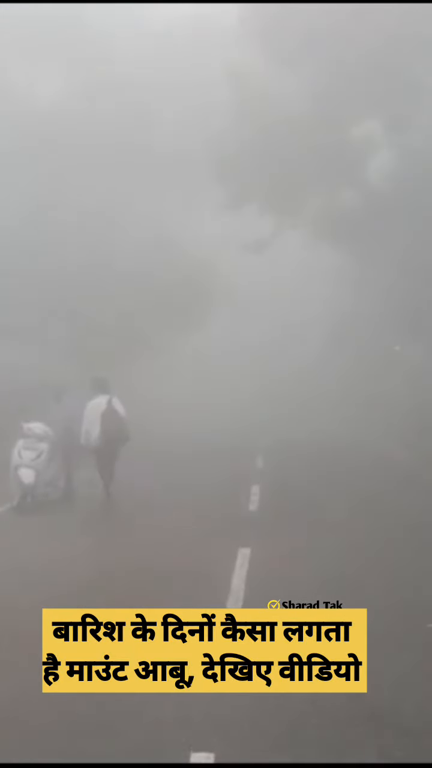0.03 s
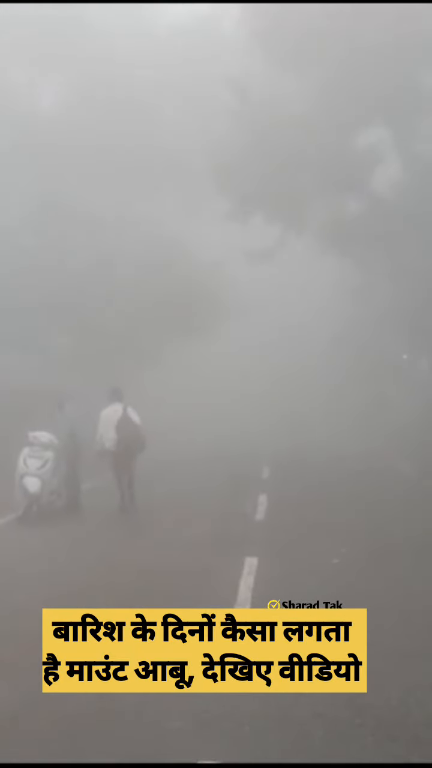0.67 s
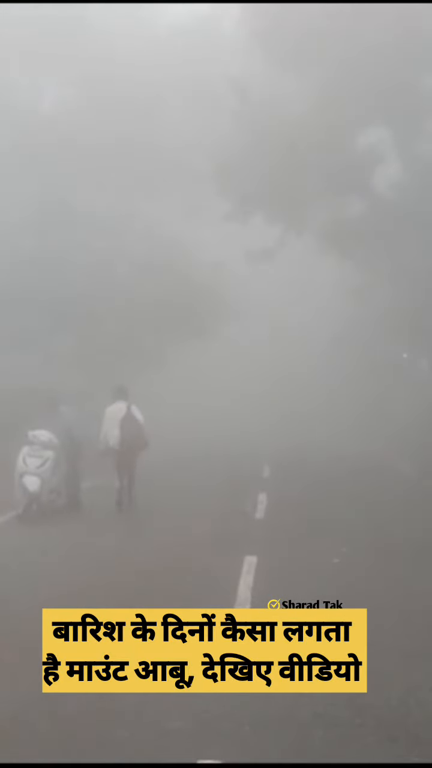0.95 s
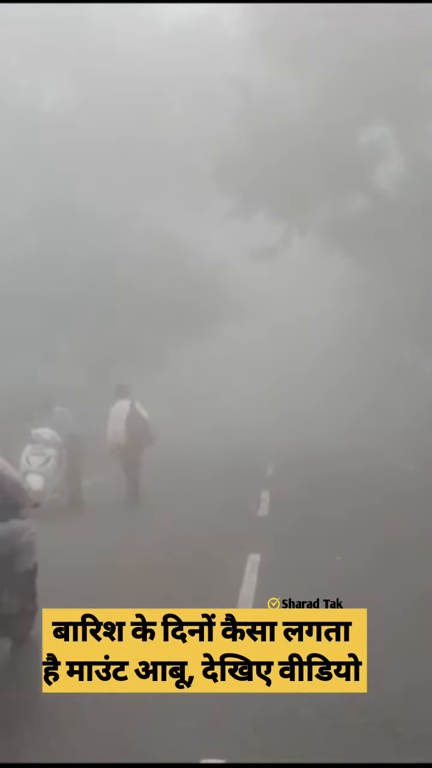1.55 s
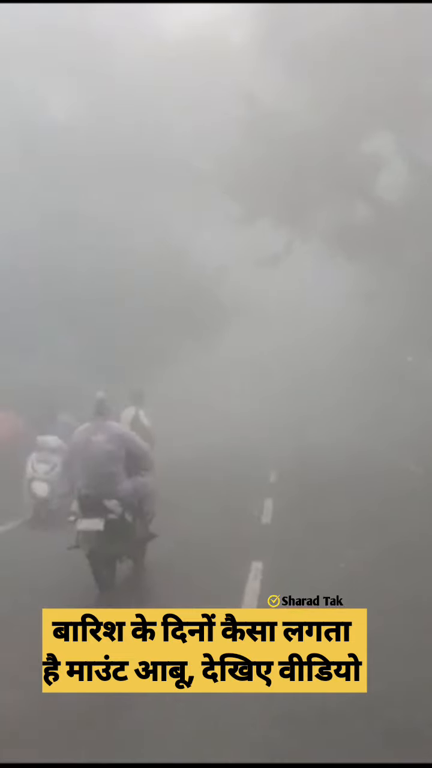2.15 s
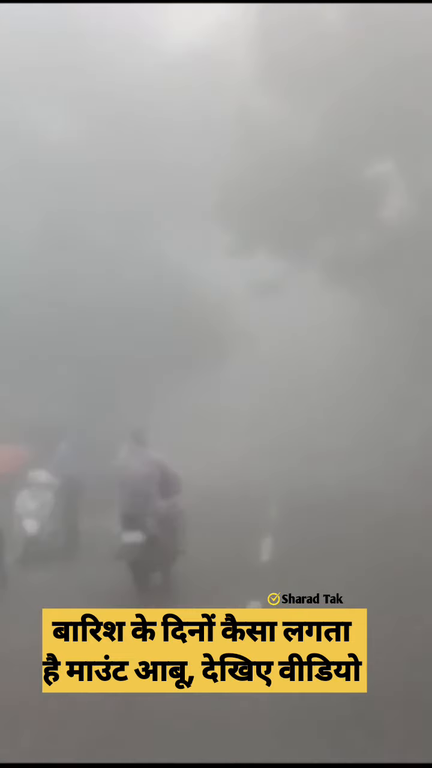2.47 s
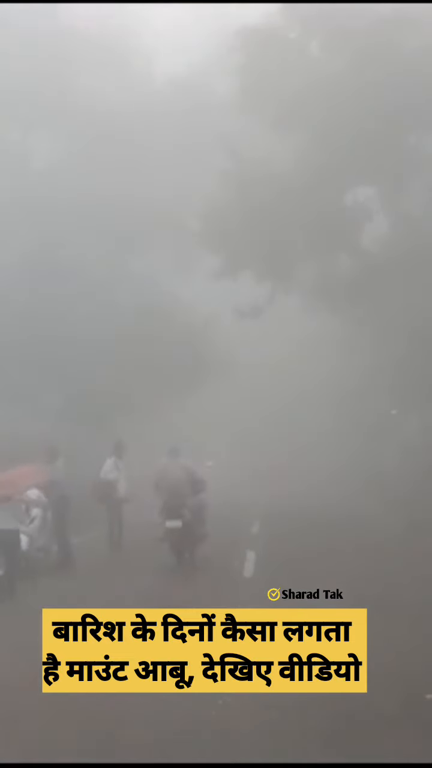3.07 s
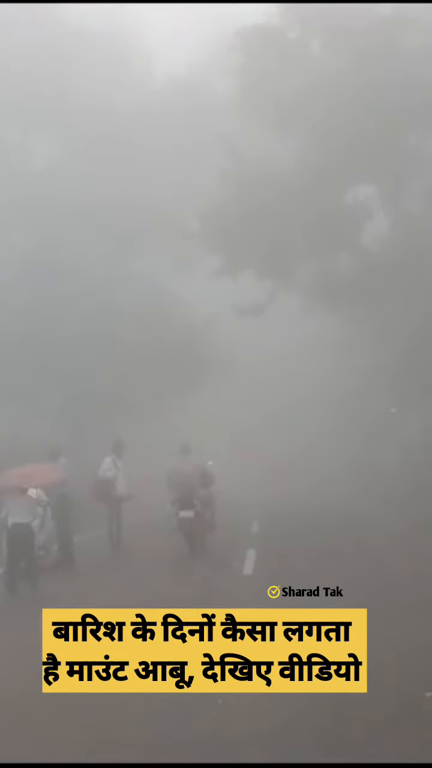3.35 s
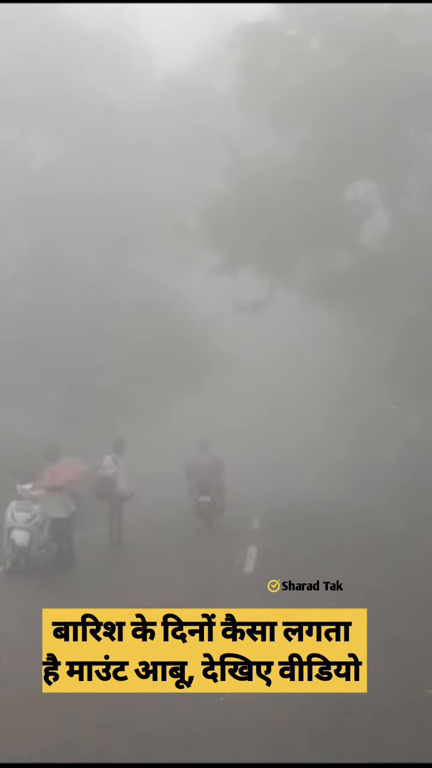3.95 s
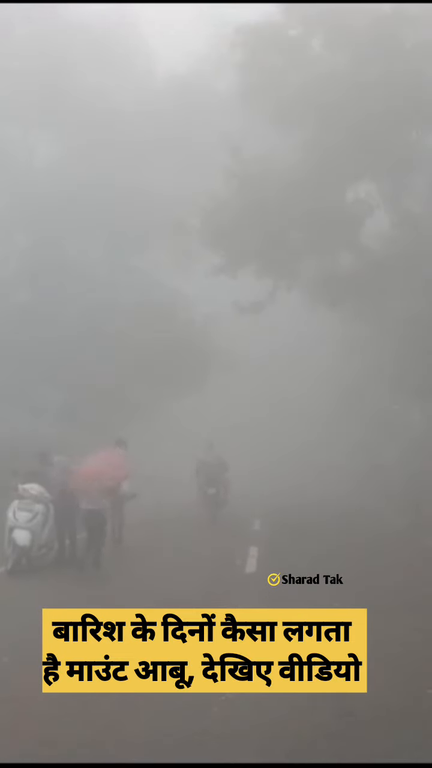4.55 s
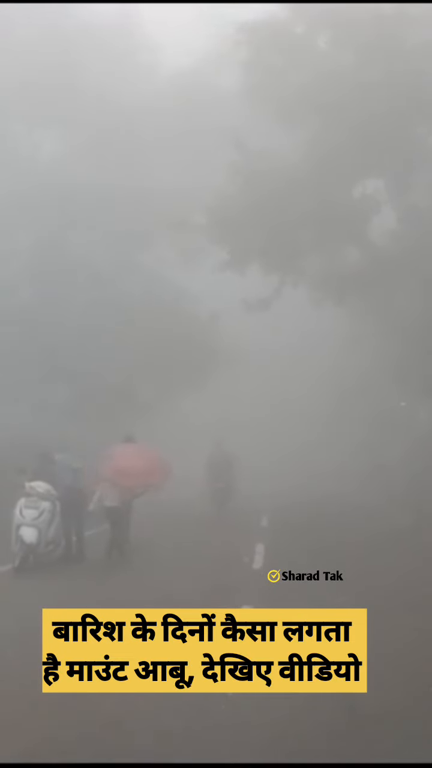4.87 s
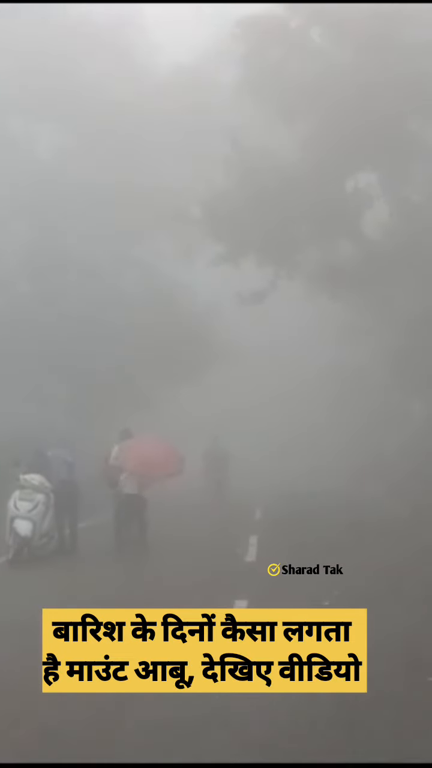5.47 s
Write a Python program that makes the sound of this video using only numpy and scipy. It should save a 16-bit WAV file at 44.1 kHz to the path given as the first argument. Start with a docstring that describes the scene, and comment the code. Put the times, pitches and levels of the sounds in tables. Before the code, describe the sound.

A motorbike passes close by on a wet street and rides off under steady rain, with a few drips and small bird chirps.

```python
"""A wet street in misty rain: a single-cylinder motorbike passes close by and rides off.
Each firing rings its silencer and spits gas from the pipe; valve gear and chain rattle the casing,
and the front tyre flings water. The street's echo takes over as the engine eases in the distance.
Under it lies a steady wash of rain, with near drips and a few small birds."""
import sys
import numpy as np
from scipy import signal
from scipy.fft import rfft, irfft
from scipy.io import wavfile
from scipy.ndimage import uniform_filter1d

SR = 44100
rng = np.random.default_rng(int(sys.argv[2]) if len(sys.argv) > 2 else 0)


def file_out(sig):
    """Save sig as 16-bit WAV at sys.argv[1]."""
    # one column per channel
    cols = np.atleast_2d(sig).T
    # limit, then scale
    lim = np.clip(cols, -1, 1)
    pcm = np.round(lim * 32767).astype(np.int16)
    wavfile.write(sys.argv[1], SR, pcm)


N = 242991
T = np.arange(N) / SR
HZ = np.fft.rfftfreq(N, 1 / SR)
PASS_S, SPEED_M_PER_S, LANE_M = 0.22, 6.74, 2.57  # abreast at PASS_S, LANE_M to the side
SOUND_M_PER_S = 343


# Engine speed. Each row: time in seconds, firings per second.
FIRING_RATE = [(0.0, 22.5), (0.42, 22.15), (0.6, 21.3), (1.0, 20.9), (1.4, 20.46), (1.8, 20.11),
               (2.2, 19.61), (2.6, 19.56), (2.9, 18.64), (3.2, 17.89), (3.6, 18.2), (4.0, 18.13),
               (4.3, 19.27), (4.6, 18.82), (4.9, 19.09), (5.2, 19.43), (5.5, 19.53)]
def cycles():
    """Running count of engine cycles; each whole number is a firing."""
    return np.cumsum(curves(FIRING_RATE)[0]) / SR + .48


def since_firing(delay_s):
    """Seconds since the last firing less delay_s; zero until then."""
    return np.maximum((cycles() % 1) / curves(FIRING_RATE)[0] - delay_s, 0)


def burst(delay_s, rise_s):
    """A quick swell and decay after each firing."""
    age = since_firing(delay_s) / rise_s
    return age * np.exp(1 - age)


def thump(hz, rise_s, sharpness, delay_s=0):
    """A silencer resonance that swells and dies after each firing."""
    envelope = burst(delay_s, rise_s) ** sharpness
    envelope *= np.minimum(10 * (1 - cycles() % 1), 1)  # gone before the next firing
    return evened(envelope * np.sin(2 * np.pi * hz * since_firing(delay_s)))


# Throttle, easing off and picking up. Each row: time in seconds, engine effort in dB.
EFFORT = [(2.4, -1.5), (2.7, -3.8), (3.55, -1.8), (3.85, -6), (4.1, -9), (4.45, -8), (5.1, -9), (5.5, -6.5)]
def exhaust():
    """Uneven firings ring the silencer; the street's echo stands out as the engine eases."""
    effort_db = curves(EFFORT)[0]
    echo_gain = amp(-12 - 0.73 * effort_db)
    boom_hz = 128.0 + 0.7 * effort_db  # rings lower as the engine eases
    # near reflections stretch the far thumps
    smear_s = np.interp(T, [1, 2.7, 3.2, 5.5], [0.011, 0.009, 0.016, 0.012])
    boom = thump(boom_hz, rise_s=smear_s, sharpness=1.76) * amp((-0.5 + 0.63 * echo_gain) * drift(16))
    bark_hz = np.interp(T, [.55, 1.1], [290, 260])
    bark = thump(bark_hz, rise_s=0.0058, sharpness=1.4, delay_s=0.00451) * amp(0.32 * drift(23))
    throb = np.sin(4 * np.pi * cycles()) * amp(2 * drift(25))  # second engine order
    # three sets of echoes crossfade along the road
    thumps = boom + amp(-13.0) * bark
    echoes = sum(np.cos(np.pi * (1.084 * T + k / 3)) * street_echo(thumps) for k in range(3))
    echoing_boom = steadied(boom + echo_gain * steadied(echoes, span_s=.15), span_s=.15)
    return level("boom") * echoing_boom + level("bark") * bark + level("throb") * throb


# Casing resonances. Each row: pitch in Hz, nominal width in Hz, relative level in dB,
# time it faces the listener in seconds, half length of that swell in seconds.
CASING_MODES = [(806, 39, -4.5, 0.94, 0.72), (1325, 25, 1.5, 0.47, .11), (1631, 55, -1.5, 0.043, 0.23),
                (1639, 58, 3.5, 0.726, 0.18), (2376, 162, -2, 1.0, 1), (2954, 40, -7, 0.25, 0.14),
                (3348, 39, 6.5, 0.28, 0.097), (3353, 43, 6, 0.015, 0.037), (4155, 270, 0, 0.41, 0.38),
                (759, 110, 3, 1.06, 0.35), (598, 65, -5, 0.62, 0.18), (434, 57, -0.5, 2.2, 0.21)]
def casing_rings(lag_s):
    """Flurries of knocks ring the casing; each Doppler-shifted resonance beams past in turn."""
    doppler = 1 / (1 + bearing() * SPEED_M_PER_S / SOUND_M_PER_S)
    rings = np.zeros((2, N))
    for hz, width_hz, db, facing_s, span_s in CASING_MODES:
        carrier = np.exp(2j * np.pi * np.cumsum(hz * doppler) / SR)
        left, right = 1 + .5 * rng.standard_normal((2, N))
        knocks = impacts(per_s=600, spread_db=-2.0) * amp(2 * drift(28))
        knocks *= 1 + 0.14 * burst(0.0036, 0.0012)
        blows = knocks * np.array([left * np.exp(-2j * np.pi * hz * lag_s), right])
        pole = [1, -np.exp(-np.pi * width_hz * 2 / SR)]
        envelope = signal.lfilter([1], pole, signal.lfilter([1], pole, blows / carrier))
        rings += amp(db) * (0.074 + swell(facing_s, span_s)) * evened((envelope * carrier).real)
    return rings


# Broad clatter spectrum. Each row: frequency in Hz, relative density in dB.
CLATTER_SPECTRUM = [(25, -9), (70, 4), (200, 1), (450, -7), (680, -12), (850, 1), (1100, 0), (1600, 3),
                    (1950, 4.5), (2500, -2), (4200, 3.5), (4800, -7), (6300, 2), (7500, -16), (8800, -30.5),
                    (16000, -21.5)]
def clatter(lag_s):
    """Broad engine noise, combed by a road bounce whose delay slides as the bike moves."""
    correlation = spectrum([(200, 0.85), (600, 0.97), (3500, 0.073), (6000, 0.85)])
    direct = noise(amp(spectrum(CLATTER_SPECTRUM)), correlation, lag_s)
    bounce_s = np.interp(T, [0, .35, .9, 2], [0.00123, 0.001306, 0.00138, 0.00068])
    bounce_gain = np.interp(T, [.6, 1.3], [.4, .1])
    combed = direct + bounce_gain * np.array([np.interp(T - bounce_s, T, side) for side in direct])
    return patchy(combed / band_rms(combed, 1400, 4800), db=3.4, width_hz=170, span_s=.06)


def casing():
    """Valve gear and chain rattle the casing; its ring blurs into clatter with distance."""
    near_share, far_share, reach_m = 0.92, 0.8, 58
    ring_share = far_share + (near_share - far_share) * np.exp(-(distance_m() / reach_m) ** 2)
    lag_s = -0.000397  # left leads
    body = amp(-1) * ring_share * casing_rings(lag_s)
    body += amp(-2) * np.sqrt(1 - 0.5 * ring_share ** 2) * clatter(lag_s)
    strokes = evened(1 + 0.19 * burst(0.0045, 0.0048) + 0.056 * burst(0.018, 0.00083))
    strokes *= amp(0.17 * drift(100))
    return level("casing") * strokes * body * bike_pan()


# Gas hiss spectrum. Each row: frequency in Hz, relative density in dB.
HISS_SPECTRUM = [(2000, -58), (5000, -2), (6150, 17.5), (7200, 9), (8600, 1), (11500, 5.5), (14000, 0),
                 (16000, -4)]
# Gas hiss balance. Each row: frequency in Hz, left over right in dB.
HISS_PAN = [(3000, -9), (6200, -12), (8000, 56), (9500, 26), (11500, 10), (13500, 0), (16000, -1)]
def pipe_hiss():
    """The pipe spits gas with each firing."""
    hiss = noise(amp(spectrum(HISS_SPECTRUM)) * pan(spectrum(HISS_PAN)))
    hiss = patchy(hiss / band_rms(hiss, 9000, 15000), db=3.5, width_hz=350, span_s=.06)
    spits = evened(0.66 + burst(0.0045, 0.0037) * amp(3.6 * drift(12)))
    return level("hiss") * spits * hiss


def chink():
    """A bright metal chink with each firing, higher coming and lower leaving."""
    hz = 6270 - 386 * bearing() + 100 * drift(14) + 260 * drift(867)
    strikes = burst(0.0071, 0.0034) * amp(4.03 * drift(30))
    return level("chink") * strikes * np.sin(2 * np.pi * np.cumsum(hz) / SR) * bike_pan()


# Tyre spray spectrum. Each row: frequency in Hz, relative density in dB.
SPRAY_SPECTRUM = [(2000, -30), (5200, 0), (6400, -9), (8000, 7), (8900, -25), (16000, -28)]
def tyre_spray():
    """Water flung ahead by the front tyre sizzles thinly."""
    spray = evened(noise(amp(spectrum(SPRAY_SPECTRUM))))
    return level("spray") * patchy(spray, db=12.5, width_hz=140, span_s=0.044) * bike_pan()


# Radiation of the bike's parts. Each row, by name: gain at LANE_M in dB, loss per tenfold distance
# in dB, boost when facing in dB, time it faces in seconds, half length in seconds (sign ignored).
RADIATION = {"boom": (-29, 3, 14, 0.9, 0.75), "bark": (-31.5, 14, 6.5, 0.4, 0.12),
             "throb": (-38, 26, 7, .42, 0.8), "casing": (-28, 25, 8, 0.01, 0.62),
             "spray": (-41.5, 27, 19, -0.5, -0.34), "hiss": (-52.5, 18, 7.3, 0.88, 1),
             "chink": (-29.5, 27.5, 14.5, 0.2, 0.47)}
def level(part):
    """Gain of one part of the bike, from effort, distance and the way it faces."""
    db, loss_db, facing_db, facing_s, span_s = RADIATION[part]
    distance_db = -loss_db * np.log10(distance_m() / LANE_M)
    return amp(db + curves(EFFORT)[0] + distance_db + facing_db * swell(facing_s, span_s))


def distance_m():
    """Range of the bike on its straight path."""
    return np.hypot(LANE_M, SPEED_M_PER_S * (T - PASS_S))


def bearing():
    """From -1 (coming) through 0 (abreast) to 1 (leaving)."""
    return SPEED_M_PER_S * (T - PASS_S) / distance_m()


def bike_pan():
    """The bike's treble swings from the right towards the middle."""
    abreast_db, away_db = -14, -2
    return pan(abreast_db + (away_db - abreast_db) * bearing())


# Rain wash spectrum. Each row: frequency in Hz, relative density in dB.
WASH_SPECTRUM = [(30, -9), (70, 5), (130, 9.5), (230, 2), (400, 0), (900, -0.5), (1600, -5.5), (2500, -11),
                 (3800, -12.5), (4900, -19.5), (6300, -13), (7500, -26), (9000, -34.5), (16000, -38)]
# Rain wash balance. Each row: frequency in Hz, left over right in dB.
WASH_PAN = [(60, 2), (110, 0.5), (200, -2), (380, 0), (700, -2.5), (1290, -6), (2380, -6.5), (4400, -9),
            (8120, -4.5), (15000, 10)]
# Diffuse sound of the street. Each row: frequency in Hz, left-right correlation.
DIFFUSE_CORRELATION = [(100, 0.9), (280, 0.75), (550, 0.68), (900, 0.028), (3000, 0.19), (8000, 0.082)]
def rain_wash():
    """Far rain on the wet street merges into a wash that slowly sinks in level."""
    colour = amp(spectrum(WASH_SPECTRUM)) * pan(spectrum(WASH_PAN))
    wash = evened(noise(colour, spectrum(DIFFUSE_CORRELATION)))
    wash = patchy(wash, db=1.8, width_hz=180, span_s=.1)
    wash_db = np.interp(T, [0, 3.5, 4.3, 5.5], [-31.0, -40.5, -40.0, -42.0])
    return amp(wash_db + 0.053 * drift(6)) * wash


# Flurries of drops. Each row: centre in seconds, half length in seconds, level in dB.
PATTER_FLURRIES = [(2.39, 0.061, -46), (3.705, 0.2, -49)]
def rain_patter():
    """Nearer drops patter faintly on the right and swell in two flurries."""
    drops = np.array([impacts(per_s=960, spread_db=3.5), impacts(per_s=890, spread_db=4)])
    colour_db = spectrum([(600, -30), (1900, -2), (2700, 17.0), (3400, 11), (4500, 6),
                          (9000, -16), (15000, -46)])
    patter = evened(irfft(rfft(drops) * amp(colour_db), N)) * pan(-12)
    flurries = sum(amp(db) * swell(centre_s, span_s) for centre_s, span_s, db in PATTER_FLURRIES)
    return (amp(-62.5) + flurries) * patter


# Near drips. Each row: start in seconds, relative level in dB, pitch in Hz.
NEAR_DRIPS = [(2.3027, -37, 2890), (2.34, -34, 2780), (2.4265, -26, 2750), (3.2113, -31.5, 3050),
              (3.4315, -36, 2310), (3.6247, -36, 2160), (3.714, -33, 2580), (3.763, -34.5, 2670),
              (3.881, -38, 2420), (3.9119, -29, 2550), (5.3816, -39.5, 2450)]
def drips():
    """Fat drops pat on something soft nearby, each with a short spray."""
    out, t = np.zeros((2, N)), np.arange(SR // 12) / SR
    age = t / 0.00083
    for start_s, db, hz in NEAR_DRIPS:
        pat = (age * np.exp(1 - age)) ** 2 * np.sin(2 * np.pi * hz * t)
        band = signal.butter(2, [0.76 * hz, 1.24 * hz], "band", fs=SR, output="sos")
        spray = signal.sosfilt(band, rng.standard_normal((2, len(t)))) * np.exp(-t / 0.02)
        add(out, start_s, amp(db + 3.5) * (pat + 0.8 * spray) * pan(-15))
    return out


# Fine splashes. Each row: start in seconds, relative level in dB, decay time in seconds.
FINE_SPLASHES = [(3.89, -59, .01), (4.409, -56, 0.015), (4.727, -51, .002), (5.002, -60, .006)]
def splashes():
    """Small drops burst in a fizz."""
    out, t = np.zeros((2, N)), np.arange(SR // 12) / SR
    highpass = signal.butter(2, 4500, "high", fs=SR, output="sos")
    for start_s, db, decay_s in FINE_SPLASHES:
        fizz = signal.sosfilt(highpass, rng.standard_normal((2, len(t))))
        add(out, start_s, amp(db + 6) * fizz * np.exp(-t / decay_s) * pan(3))
    return out


# Bird chirps. Each row: start in seconds, length in seconds, first and last pitch in Hz,
# relative level in dB, left over right in dB, rms pitch jitter in Hz.
BIRD_CHIRPS = [(2.079, 0.075, 5970, 5420, -43, -5, 706), (2.808, 0.066, 6480, 6160, -39.5, 9, 50),
               (3.697, 0.064, 4220, 4820, -43, 1, 420), (3.784, 0.053, 3630, 4250, -45, -5, 320),
               (4.57, 0.071, 8500, 8900, -59, -10, 150), (5.011, 0.078, 6270, 5950, -45.5, 10, 220),
               (5.052, .15, 5980, 6000, -56, -10, 200), (5.086, 0.048, 3600, 4100, -48.5, 7, 250)]
def birds():
    """Short gliding chirps from the trees; pitch jitter makes some raspy."""
    out = np.zeros((2, N))
    for start_s, length_s, first_hz, last_hz, db, left_db, jitter_hz in BIRD_CHIRPS:
        count = int(length_s * SR)
        hz = np.linspace(first_hz, last_hz, count) + jitter_hz * drift(710)[:count]
        note = np.sin(2 * np.pi * np.cumsum(hz) / SR) * np.hanning(count)
        add(out, start_s, amp(db + 1) * note * pan(left_db))
    return out + amp(-8) * street_echo(out)


# Street reverberation. Each row: frequency in Hz, time to fall 60 dB in seconds.
STREET_T60 = [(100, 0.56), (500, 0.14), (3000, 0.28), (12000, 0.21)]
def street_echo(x):
    """Scattered echoes from walls and trees, alike on both sides in the bass."""
    taps = rng.standard_normal((2, SR)) * (np.arange(SR) > .012 * SR)
    hz, t, (a, b) = signal.stft(taps, SR, nperseg=512)
    correlation = spectrum(DIFFUSE_CORRELATION, hz)[:, None]
    bins = np.array([a, correlation * a + np.sqrt(1 - correlation ** 2) * b])
    decay = amp(-60 * t / spectrum(STREET_T60, hz)[:, None])
    tail = signal.istft(bins * decay, SR, nperseg=512)[1]
    wet = signal.fftconvolve(np.atleast_2d(x), tail, axes=1)[:, :N]
    return evened(wet) * np.std(x)


def amp(db):
    """Decibels to gain."""
    return 10 ** (np.asarray(db) / 20)


def evened(x):
    """Scales to rms 1."""
    return x / np.sqrt(np.mean(x ** 2) + 1e-20)


def steadied(x, span_s):
    """Scales to a running rms near 1."""
    power = uniform_filter1d((x ** 2).mean(0), int(span_s * SR))
    return x / np.sqrt(uniform_filter1d(power, int(span_s * SR)) + 1e-12)


def band_rms(x, low_hz, high_hz):
    """Level of the mid channel within a band."""
    return np.std(irfft(rfft(x.mean(0)) * ((HZ > low_hz) & (HZ < high_hz)), N))


def spectrum(points, hz=HZ):
    """Joins points on a log-frequency axis."""
    point_hz, value = np.transpose(points)
    return np.interp(np.log(hz + 1), np.log(point_hz + 1), value)


def curves(rows):
    """Each column of a time table, sample by sample."""
    times_s, *columns = np.transpose(rows)
    return [np.interp(T, times_s, column) for column in columns]


def swell(centre_s, span_s):
    """A Gaussian rise and fall."""
    return np.exp(-((T - centre_s) / span_s) ** 2)


def pan(left_db):
    """Stereo gains for a level of left over right."""
    pair = amp(np.array([[.5], [-.5]]) * left_db)
    return pair / np.sqrt(np.mean(pair ** 2, axis=0))


def add(mix, start_s, sound):
    """Mixes in a stereo sound."""
    part = mix[:, max(round(start_s * SR), 0):][:, :sound.shape[-1]]
    part += sound[..., :part.shape[-1]]


def drift(hz):
    """Smooth random motion of rms 1, rolled off above hz."""
    return evened(irfft(rfft(rng.standard_normal(N)) * np.exp(-(HZ / hz) ** 2), N))


def noise(gain, correlation=0, lag_s=0):
    """Coloured stereo noise, the left side late by lag_s."""
    a, b = rfft(rng.standard_normal((2, N)))
    left = a * np.exp(-2j * np.pi * HZ * lag_s)
    right = correlation * a + np.sqrt(1 - correlation ** 2) * b
    return irfft(gain * np.array([left, right]), N)


def impacts(per_s, spread_db):
    """Random impulses of uneven size."""
    size = amp(spread_db * np.minimum(rng.exponential(1, N), 3))
    return size * rng.choice([-1, 1], N) * (rng.random(N) < per_s / SR)


def patchy(x, db, width_hz, span_s):
    """Random patches of the spectrum swell and fade, on scales of width_hz and span_s."""
    hz, t, bins = signal.stft(x, SR, nperseg=1024, noverlap=768)
    shape = bins.shape[1:]
    along = np.fft.fftfreq(len(hz), hz[1])[:, None] * width_hz
    across = np.fft.rfftfreq(len(t), t[1]) * span_s
    blur = np.exp(-along ** 2 - across ** 2)
    field = np.fft.irfft2(np.fft.rfft2(rng.standard_normal(shape)) * blur, shape)
    gain = evened(amp(db * evened(field)))
    return signal.istft(bins * gain, SR, nperseg=1024, noverlap=768)[1][:, :N]


def scene():
    """The bike, the rain and the birds."""
    bike = exhaust() + casing() + pipe_hiss() + chink() + tyre_spray()
    return bike + rain_wash() + rain_patter() + drips() + splashes() + birds()


def record(dry):
    """Cuts the deepest bass and the top treble."""
    highpass = signal.butter(2, 22, "high", fs=SR, output="sos")
    lowpass = signal.firwin(511, 15850, window=("kaiser", 9), fs=SR)
    return signal.oaconvolve(signal.sosfilt(highpass, dry), lowpass[None], "same")


dry = scene()
out = record(dry)
file_out(out)
```